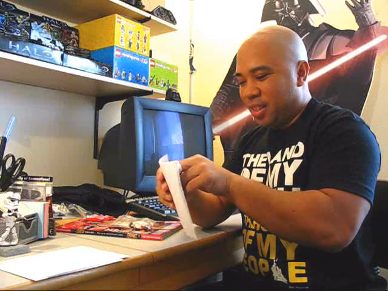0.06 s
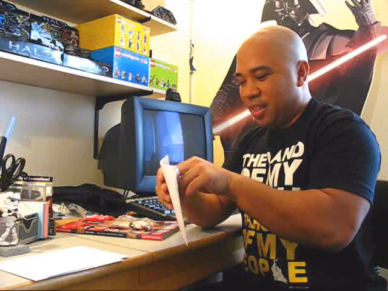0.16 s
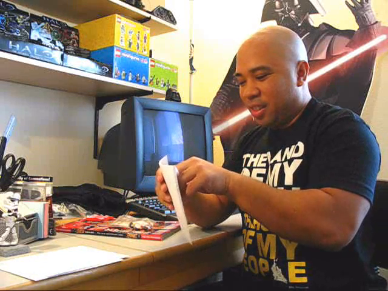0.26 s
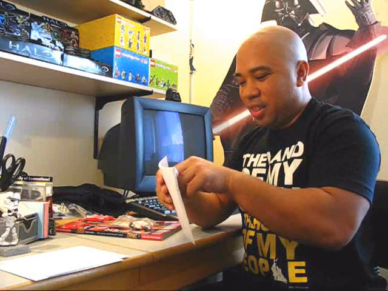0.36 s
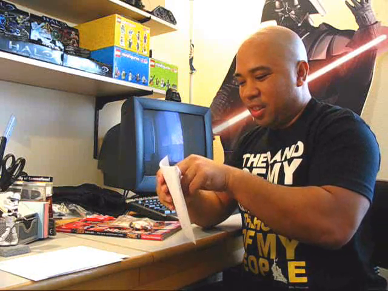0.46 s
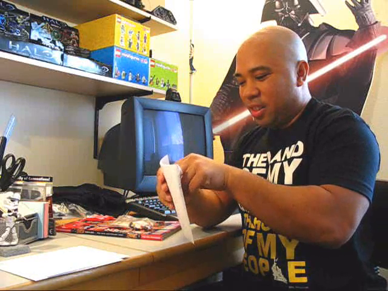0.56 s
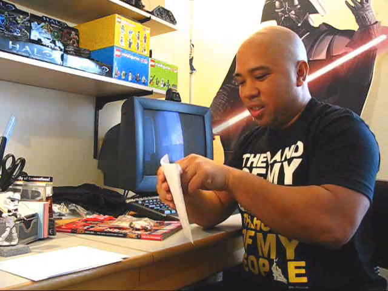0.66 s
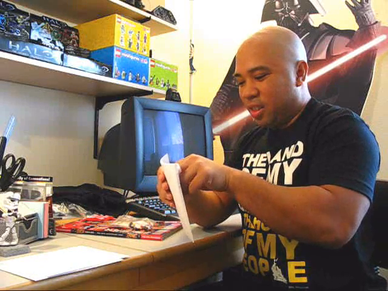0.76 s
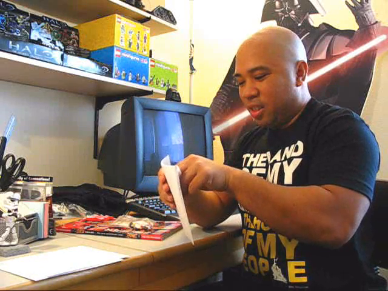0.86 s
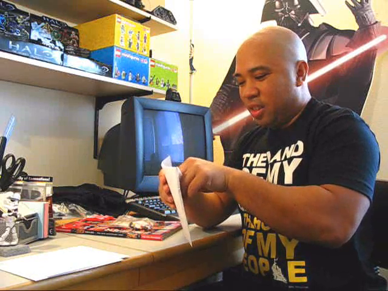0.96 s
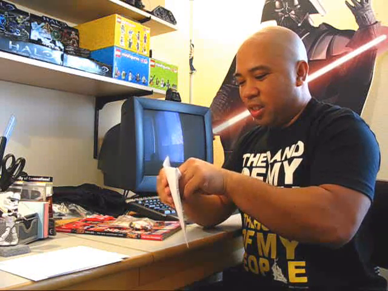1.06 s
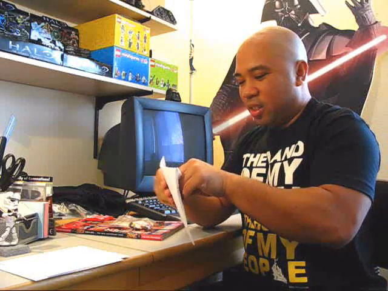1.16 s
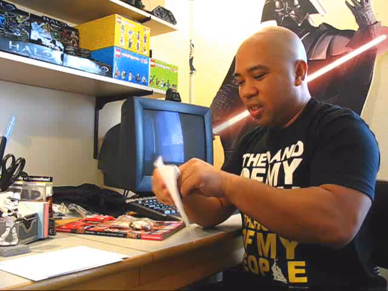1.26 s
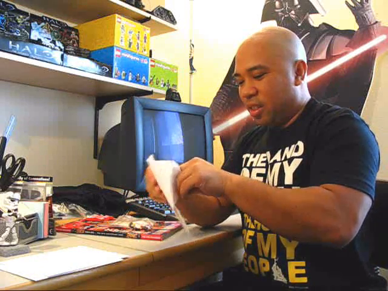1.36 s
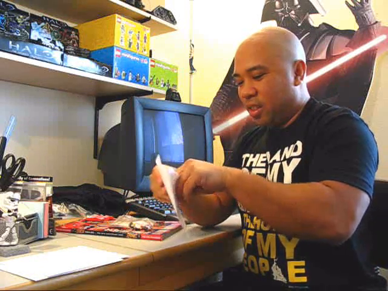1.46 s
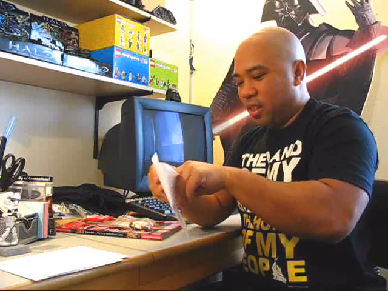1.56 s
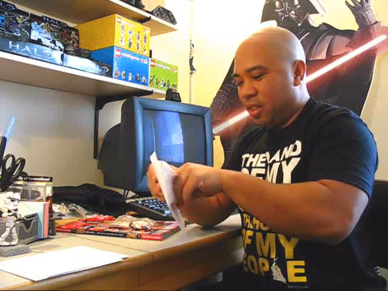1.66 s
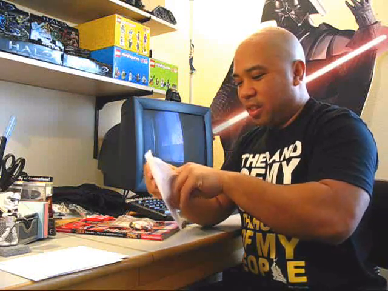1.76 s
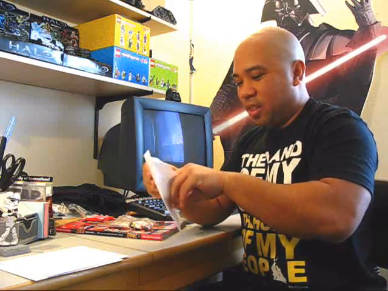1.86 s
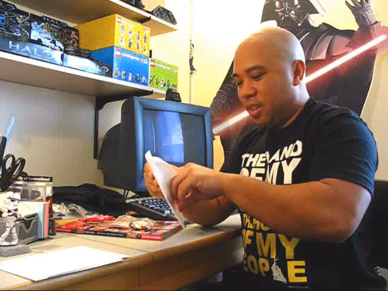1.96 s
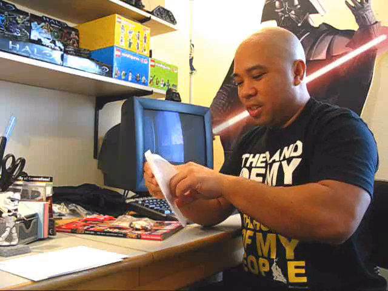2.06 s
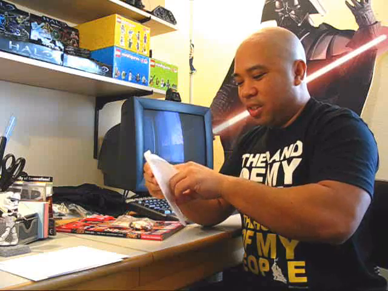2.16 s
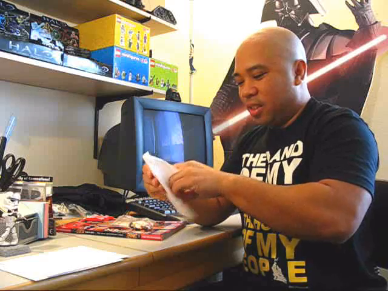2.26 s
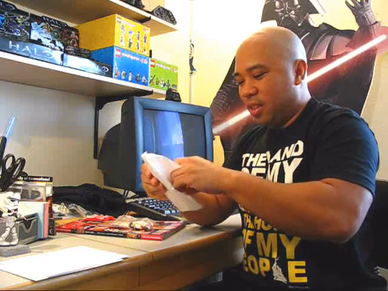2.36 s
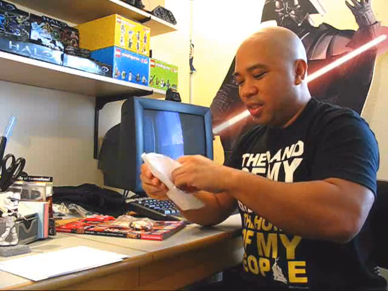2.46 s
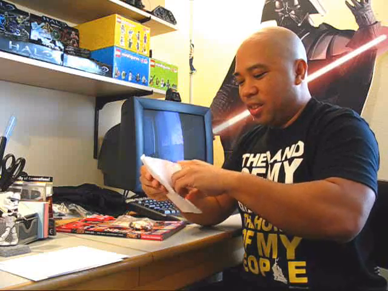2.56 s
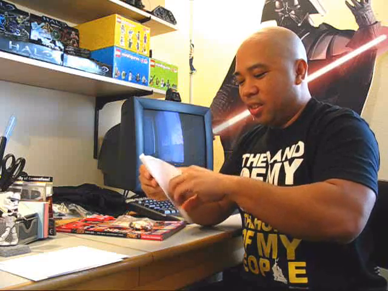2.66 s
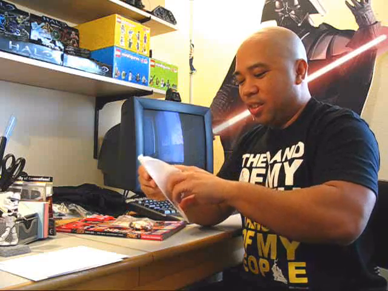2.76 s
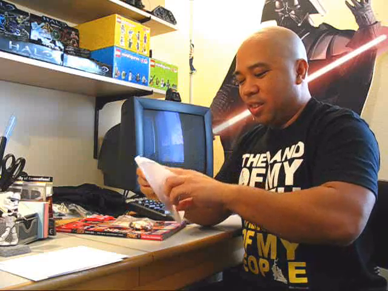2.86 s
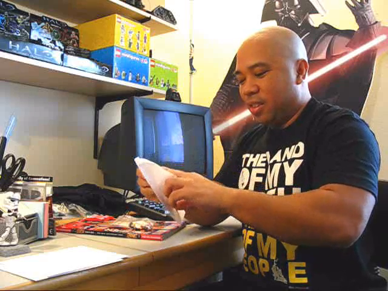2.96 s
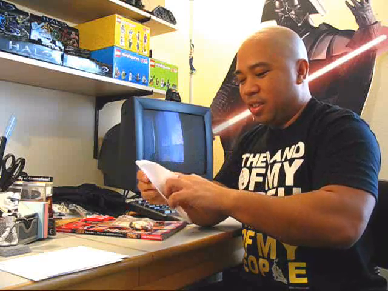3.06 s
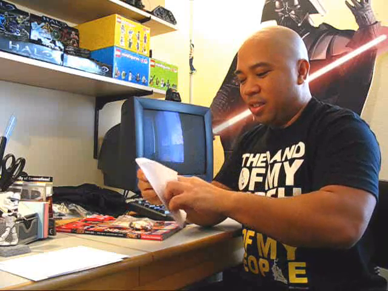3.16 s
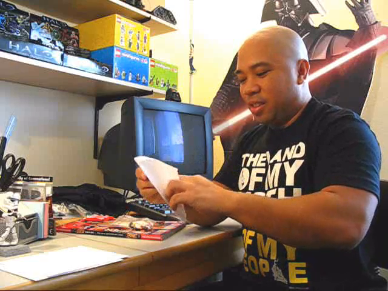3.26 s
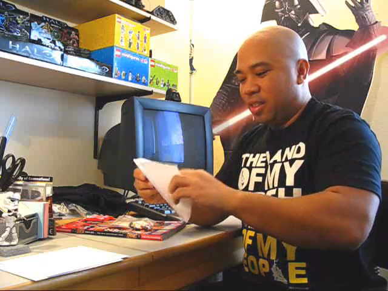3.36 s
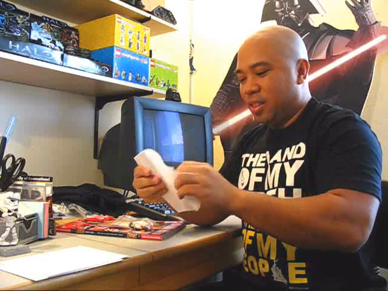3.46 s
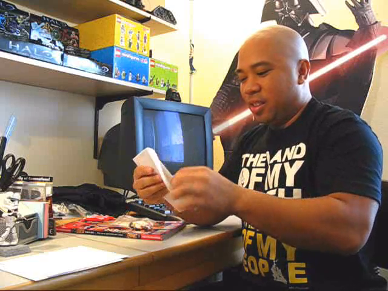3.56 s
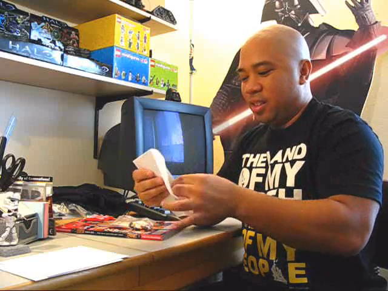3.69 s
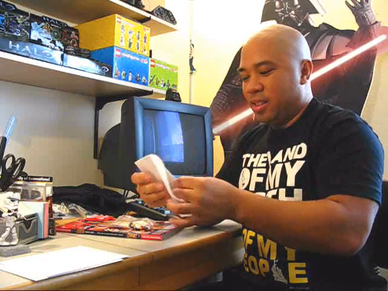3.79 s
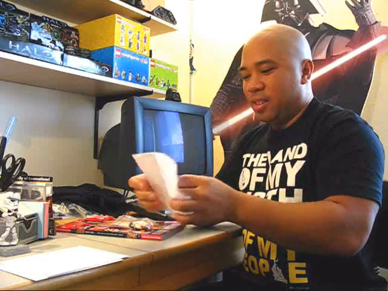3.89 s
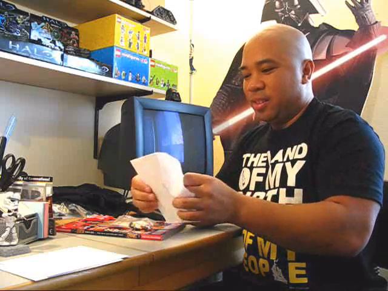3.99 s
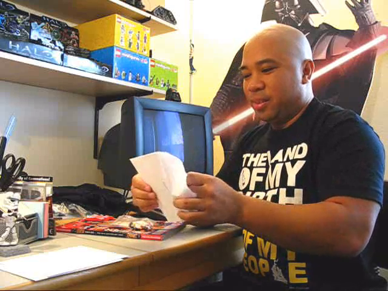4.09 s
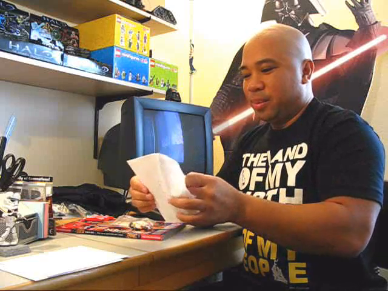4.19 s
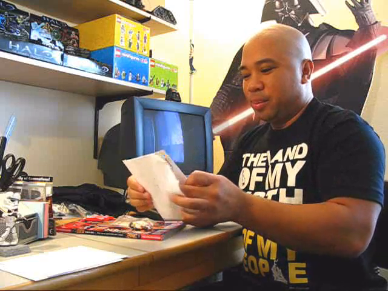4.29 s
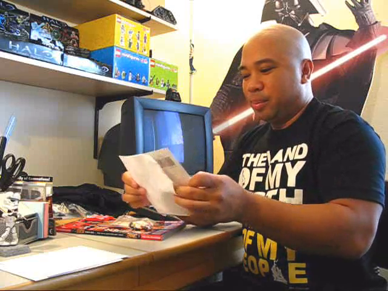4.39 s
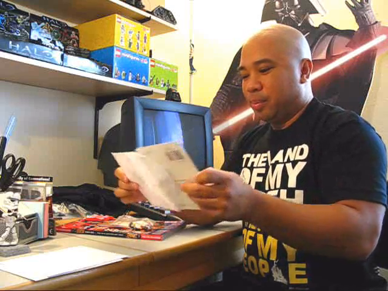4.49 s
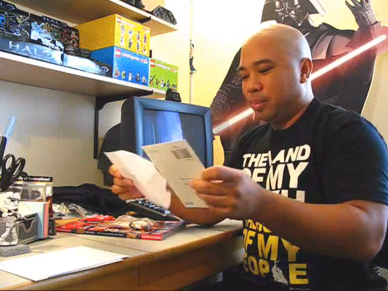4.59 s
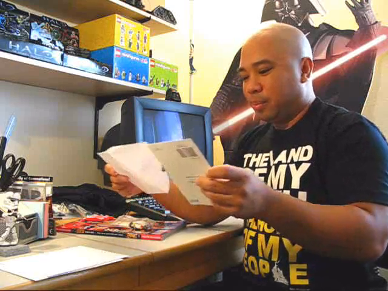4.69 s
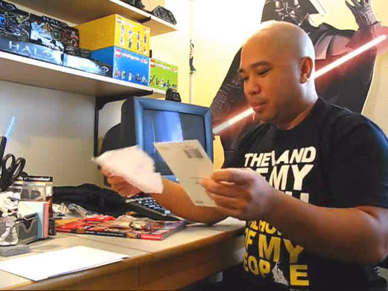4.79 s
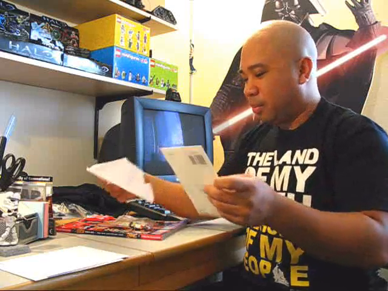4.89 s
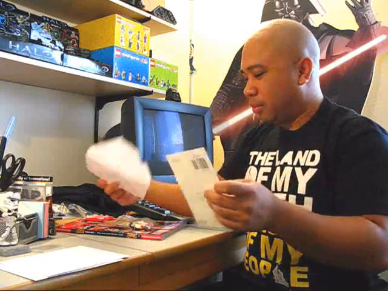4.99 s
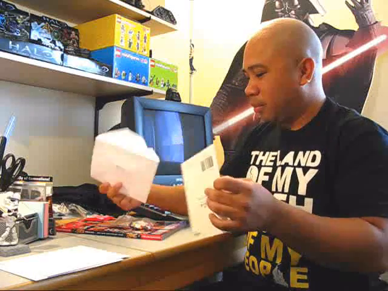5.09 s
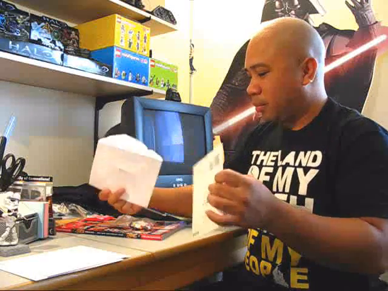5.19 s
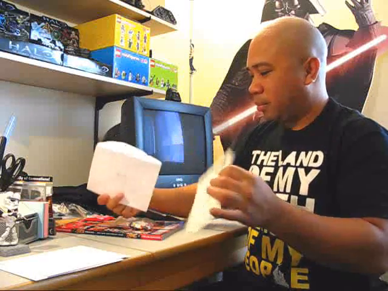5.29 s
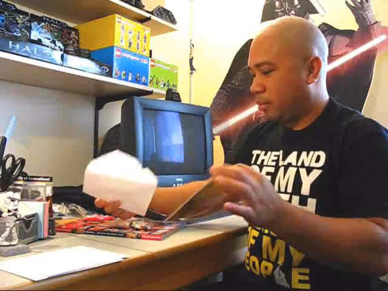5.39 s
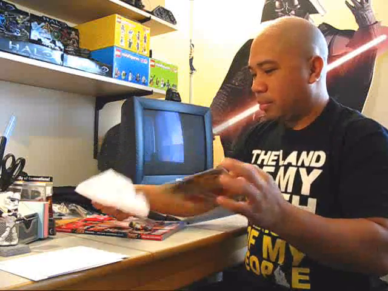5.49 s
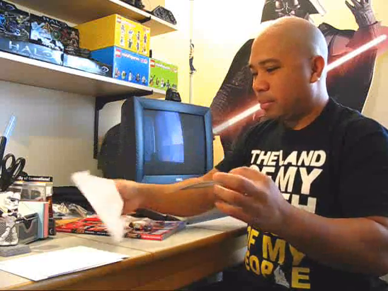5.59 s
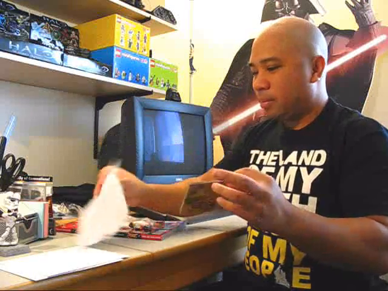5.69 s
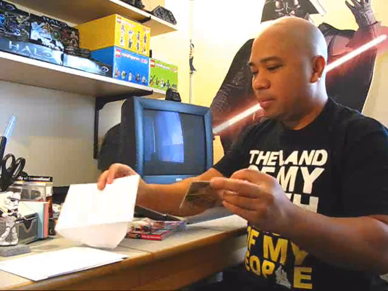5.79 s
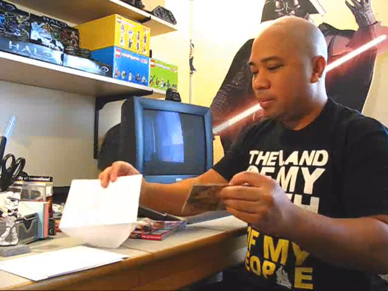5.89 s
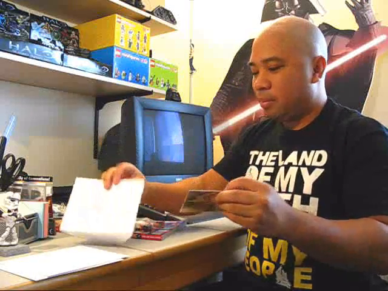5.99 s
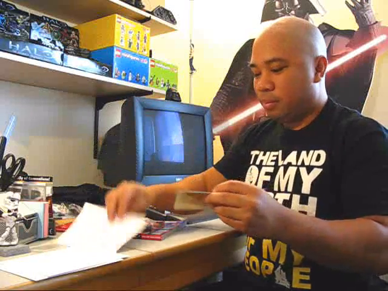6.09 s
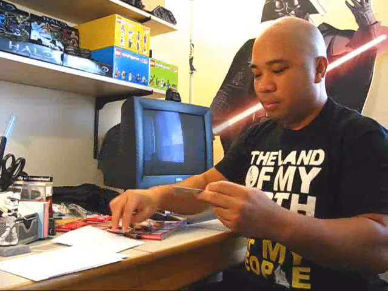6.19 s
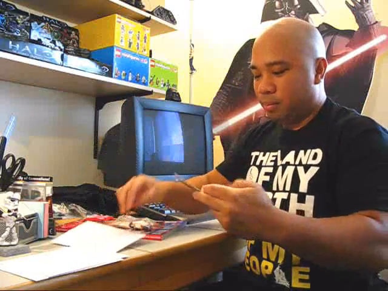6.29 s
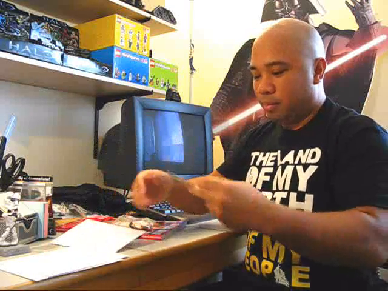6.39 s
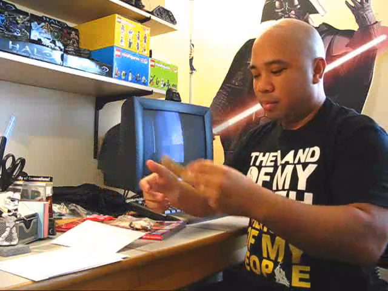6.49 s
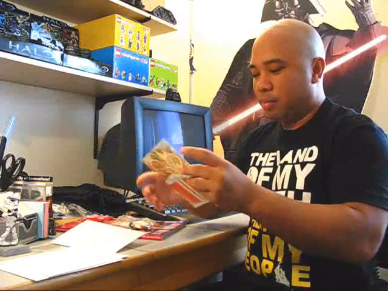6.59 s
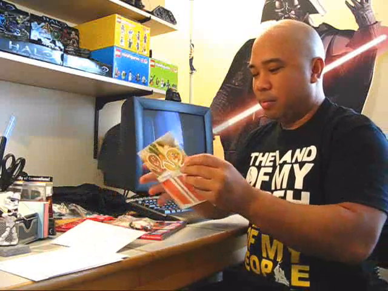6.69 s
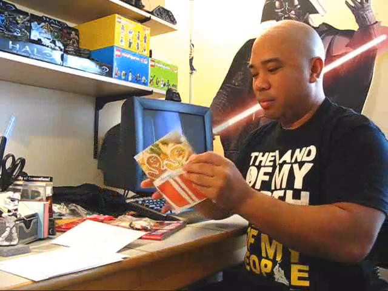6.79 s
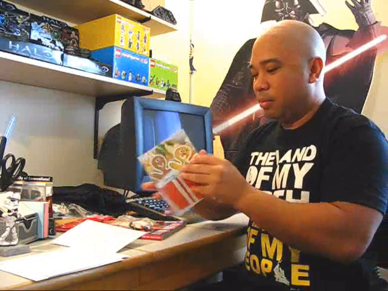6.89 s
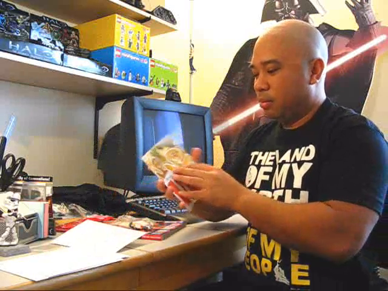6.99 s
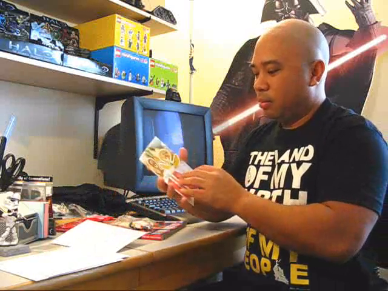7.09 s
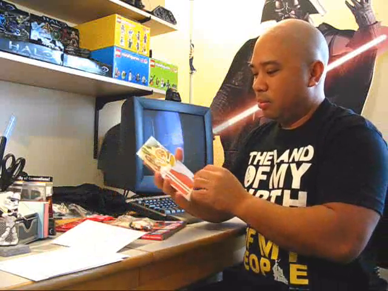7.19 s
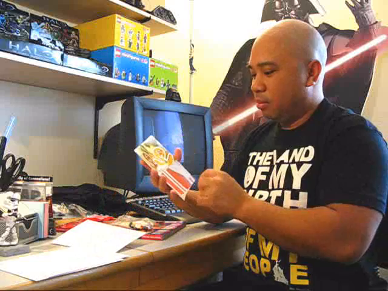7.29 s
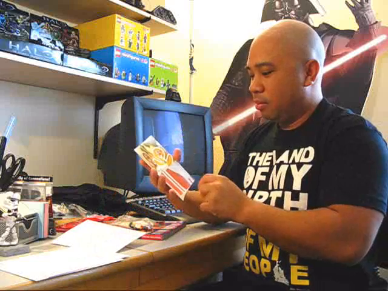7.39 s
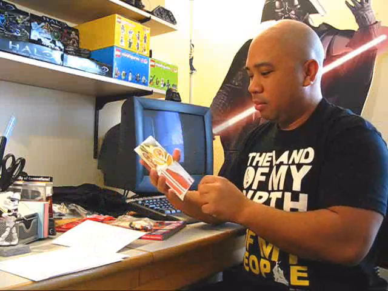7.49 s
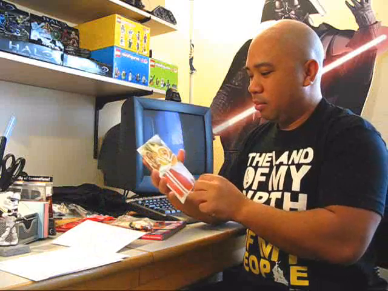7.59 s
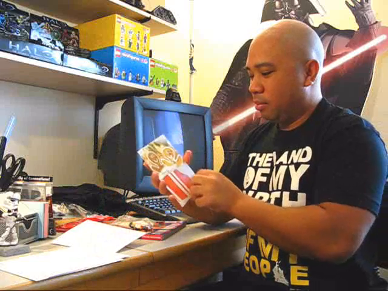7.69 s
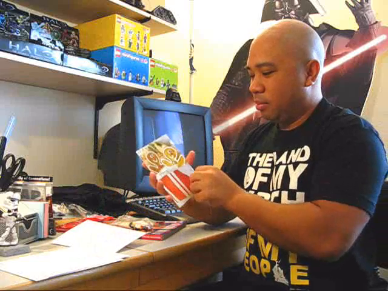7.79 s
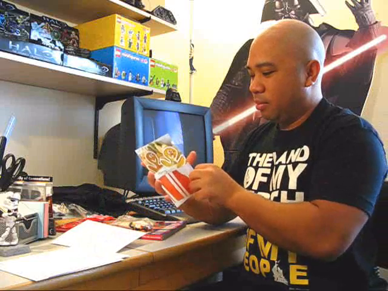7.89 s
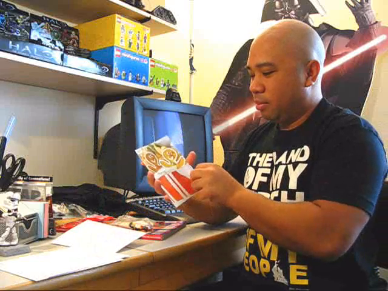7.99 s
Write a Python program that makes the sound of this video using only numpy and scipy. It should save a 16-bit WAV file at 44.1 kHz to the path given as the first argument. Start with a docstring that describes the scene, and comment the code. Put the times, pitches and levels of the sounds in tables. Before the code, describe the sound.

A paper envelope is torn open with crisp rips and snaps, then a card slides out and is softly handled in a small room.

```python
"""A paper envelope is torn open at a desk in a small room; a card slides out, the envelope drops.
Creases snap as panels flip, fibres part in dense crackle, sheets rub; the envelope's pocket colours these.
Two loud snaps carry a short low thump, and fingertips tap the card.
The walls answer each snap, over a steady room hiss."""
import sys
import numpy as np
from scipy import signal
from scipy.fft import rfft, irfft, next_fast_len
from scipy.io import wavfile
from scipy.ndimage import uniform_filter1d, map_coordinates

SR = 44100
rng = np.random.default_rng(int(sys.argv[2]) if len(sys.argv) > 2 else 0)


def put_to_file(sound):
    """Save the sound as 16-bit audio at rate SR, in the file named by the first command-line argument."""
    columns = np.atleast_2d(sound).T  # one column per channel
    safe = np.clip(columns, -1, 1)
    whole_steps = np.round(safe * 32767)
    wavfile.write(sys.argv[1], SR, whole_steps.astype(np.int16))


N = 355005


def amp(db):
    """dB to gain."""
    return 10 ** (np.asarray(db) / 20)


def unit(x):
    """x at rms 1."""
    return x / np.sqrt(np.mean(x ** 2) + 1e-20)


def along(points, hz):
    """Interpolate (hz, value) points on a log frequency axis."""
    point_hz, values = np.transpose(points)
    return np.interp(np.log(hz + 1), np.log(point_hz + 1), values)


def filtered(x, response):
    """x through response(hz)."""
    size = next_fast_len(len(x) + 8192)
    return irfft(rfft(x, size) * response(np.fft.rfftfreq(size, 1 / SR)), size)[:len(x)]


def coloured(x, spectrum):
    """x shaped by (hz, gain_db) points, at rms 1."""
    return unit(filtered(x, lambda f: amp(along(spectrum, f))))


def wobble(rate_hz):
    """Smooth random curve with knots at rate_hz."""
    knots = rng.standard_normal(int(N * rate_hz / SR) + 4)
    return map_coordinates(knots, [np.arange(N) * rate_hz / SR])


def resonance(hz, q):
    """Causal band-pass response around hz."""
    return lambda f: 1j * f * hz / q / (hz * hz - f * f + 1j * f * hz / q)


def hiss(level_db=-49):
    """Room air and microphone noise, wavering slightly."""
    # noise floor: freq_hz, gain_db
    spectrum = [(12, -30), (25, -6.5), (70, -2), (250, 0), (500, -1), (1000, -5), (2000, -8.5),
                (4000, -12.5), (8000, -16), (13000, -18.5), (16000, -22)]
    noise = coloured(rng.standard_normal(N), spectrum)
    return amp(level_db + 0.2 * wobble(3.97)) * noise


def room_response(answer_db=-6.5, build_s=0.0023):
    """Direct sound, first wall echoes and a fresh diffuse tail."""
    # room decay: freq_hz, t60_s
    decay = [(300, 0.5), (2000, 0.3), (6000, 0.27), (14000, 0.18)]
    # first echoes: delay_s, gain_db
    walls = [(.007, -28), (.0125, -3), (.0195, -23), (.0245, -25)]
    hz, t, spectra = signal.stft(rng.standard_normal(SR // 3), SR, nperseg=256)
    spectra = spectra * amp(-60 * t / along(decay, hz)[:, None])
    response = signal.istft(spectra, SR, nperseg=256)[1][:SR // 3]
    response *= 1 - np.exp(-(np.arange(len(response)) / SR / build_s) ** 2)
    response /= np.linalg.norm(response)
    for (delay_s, gain_db), sign in zip(walls, rng.choice([-1, 1], len(walls))):
        response[round(delay_s * SR)] += sign * amp(gain_db)
    response *= amp(answer_db)
    response[0] = 1
    return response


def finger_taps(rise_s=0.00049, decay_s=0.0043):
    """A soft fingertip bends the card for a few low cycles."""
    # taps on the card: start_s, level_db, pitch_hz
    taps = [(6.922, -29.5, 430), (6.979, -27.5, 230), (6.984, -26, 508)]
    out, t = np.zeros(N + SR), np.arange(SR // 10) / SR
    envelope = np.exp(-t / decay_s) * (1 - np.exp(-t / rise_s))
    for start_s, level_db, pitch_hz in taps:
        out[round(start_s * SR):][:len(t)] += amp(level_db) * np.sin(2 * np.pi * pitch_hz * t) * envelope
    return out[:N]


def low_thumps(rise_s=0.00062):
    """Short, one-sided low thumps that come with two loud snaps."""
    # thumps: start_s, peak_db
    thumps = [(0.243, -30.5), (2.319, -26)]
    out, age = np.zeros(N + SR), np.arange(SR // 50) / SR / rise_s
    for start_s, peak_db in thumps:
        out[round(start_s * SR):][:len(age)] += amp(peak_db) * age * np.exp(1 - age)
    return out[:N]


def pocket(x, cutoff_hz=300):
    """The envelope lifts its own resonances a little; a small sheet radiates no bass."""
    # pocket and flap modes: pitch_hz, width_hz, relative_db
    modes = [(820, 6.8, -25), (1480, 12, 1), (1680, 7.6, -8), (2830, 300, -36.5)]
    lift = lambda f: 1 + .5 * sum(amp(db) * resonance(hz, hz / width_hz)(f) for hz, width_hz, db in modes)
    low_cut = lambda f: (1j * f / (cutoff_hz + 1j * f)) ** 2
    return filtered(x, lambda f: lift(f) * low_cut(f))


def crease_snaps(edge_db=-0.5, onset_delay_s=.0008, crack_hz=10000, thud_hz=900):
    """A crease snaps: a short ringing click, a bright crack and the room's echo."""
    # crease snaps: start_s, level_db, panel_hz, edge_hz, thud_db, crack_db (last two re the swing)
    snaps = [(0.1445, -23, 1190, 3570, 2.5, -34), (0.2009, -16.5, 3490, 3680, -39, -20),
             (0.2442, 3.5, 2660, 5600, -16.5, -5), (0.348, -11, 2220, 3900, -7, -24),
             (0.4882, -14.5, 2340, 5100, -21, -8), (0.5072, -19.5, 2320, 3710, -8, -31),
             (0.602, -23, 2670, 3640, -4.5, -25), (0.6428, -11.5, 2970, 3770, -15, -28),
             (0.6536, -10, 2320, 3600, -21, -29), (0.7116, -15.5, 3270, 4160, -34, -16),
             (0.764, -18.5, 2990, 6340, -24, -2), (0.9645, -10, 2800, 5350, -33, -26),
             (1.0334, -14.5, 2970, 5550, -26, -15), (1.075, -4, 2140, 3400, -18, -9),
             (1.1344, -1, 3200, 8850, -18, -11), (1.3435, -9, 2300, 6500, -16, -6),
             (1.3497, -9, 2730, 4030, -42, 0), (1.479, -18, 2680, 5140, -3, -24),
             (1.594, -22, 3590, 4300, -7, 3), (1.6091, -8, 2250, 4200, -44, 1),
             (1.8535, -16, 3540, 3950, -37, 1), (1.8761, -9.5, 1520, 7300, -41, -2),
             (2.0036, -10.5, 3030, 8360, -14.5, -22), (2.0492, -13, 3000, 3860, -37, -7),
             (2.0807, -22, 1560, 3690, -21, -16), (2.1053, -22, 2860, 5010, -37, -6),
             (2.2035, -21, 2360, 4300, -6, 0), (2.22, -20, 3240, 4270, -25, -18),
             (2.3204, -1, 2810, 5540, -20, 1.5), (2.4486, -19, 1500, 3880, -25, -12),
             (2.4696, -0.5, 2360, 3910, -17.5, -11), (2.5326, -14, 3280, 4240, -26, -16),
             (2.588, -18, 3500, 8300, -38, 9), (2.6388, -7, 2900, 7960, -29, -9),
             (2.7374, -21, 2490, 3800, -20, -20), (2.7433, -20, 3410, 3840, -30, -15),
             (2.7865, -19, 2500, 4170, -17, -2), (2.81, -8, 2450, 5300, -15.5, -28),
             (2.8947, -23, 820, 3920, 7, -18), (2.9302, -2.5, 3120, 4560, -35, -2),
             (3.0981, -2, 3080, 5200, -33, -2), (3.1574, -5, 3440, 5300, -10, -7),
             (3.3414, -24.5, 2180, 3960, -10, -16), (3.4156, -19.5, 2670, 4750, -9, -22),
             (3.466, -2.5, 3130, 5330, -9.5, -6), (3.4726, -5, 3230, 3860, -35, -2.5),
             (3.5774, -17, 3030, 4700, -22, -13), (4.0315, -3.5, 3420, 4700, -47, -13),
             (4.1944, -25.5, 3300, 3760, -2, -4), (4.2939, -11.5, 2800, 4030, -29, -17),
             (4.3316, -15, 1980, 5440, -29, -14), (4.4028, -14, 3600, 3750, -22, -16),
             (4.4606, -8.5, 2480, 3840, -15, -0.5), (5.1809, -34, 1010, 3600, 7, -24),
             (5.282, -35, 1010, 6860, 5, -17), (6.1157, -23, 1650, 3600, 2.5, -22),
             (6.1236, -14.5, 1700, 3860, 0.5, -19), (6.1324, -14.5, 3080, 4260, -20, -26),
             (6.202, -14.5, 1820, 3900, -8, -29), (6.324, -33, 2060, 3940, -17, -25),
             (6.9736, -24, 1740, 8400, 1, -20), (6.9803, -21, 1390, 4660, -22, -28),
             (7.0855, -26.5, 2090, 3940, -15, -11)]
    out, t = np.zeros(N + SR), np.arange(SR // 50) / SR
    for start_s, level_db, panel_hz, edge_hz, thud_db, crack_db in snaps:
        flip_noise, crack_noise = rng.standard_normal((2, len(t)))
        pulse = np.exp(-t / .00004) + 0.4 * np.exp(-t / 0.0003) * flip_noise
        steps = np.zeros(SR // 300)  # the crease gives way in a few quick steps
        steps[rng.integers(8, len(steps), 3)] = .55 * rng.uniform(-1, 1, 3)
        steps[0] = 1
        flip = np.convolve(pulse, steps)[:len(t)]
        panel, edge = resonance(panel_hz, q=2.1), resonance(edge_hz, q=2.5)
        swing = filtered(flip, lambda f: panel(f) - amp(edge_db) * edge(f))
        crack = filtered(np.exp(-t / 0.001) * crack_noise, lambda f: resonance(crack_hz, q=1.2)(f) ** 2)
        thud = np.sin(2 * np.pi * thud_hz * t) * np.exp(-t / 0.0009)
        snap = swing / np.abs(swing).max() + amp(crack_db) * crack / np.abs(crack).max()
        snap += amp(thud_db) * thud
        heard = signal.fftconvolve(snap, room_response())
        out[round((start_s + onset_delay_s) * SR):][:len(heard)] += amp(level_db) * heard
    return out[:N]


def fibre_ticks(rate_hz, spread_db, rattle_s=0.00025):
    """Fibres part one by one: clumped, uneven ticks over the smooth rush of their echoes."""
    chance = rate_hz / SR * amp(2.4 * wobble(60))
    ticks = (rng.random(N) < chance) * amp(spread_db * np.minimum(rng.exponential(1, N), 3))
    bursts = signal.lfilter([1], [1, -np.exp(-1 / (rattle_s * SR))], ticks)
    return unit(bursts * rng.standard_normal(N)) + rng.standard_normal(N)


def sheet_bending(x, depth_db):
    """The bending sheet keeps changing which pitches it radiates."""
    spectra = signal.stft(x, nperseg=512)[2]
    patches = uniform_filter1d(rng.standard_normal(spectra.shape), size=4, axis=0)
    patches = uniform_filter1d(patches, size=6, axis=1)
    return signal.istft(spectra * amp(depth_db * unit(patches)), nperseg=512)[1][:N]


def stroke_gains(rise_db=20):
    """Crackle, flex and fibre gains: each stroke rises, holds and fades; powers add."""
    # rips and rubs: full_s, rise_s, hold_s, crackle_db, flex_db, fibre_db (last two re crackle)
    strokes = [(0.0, .01, 0.0084, -25, -6, -1.5), (.15, .006, .035, -46, 2.5, -8),
               (0.207, 0.03, 0.017, -36.5, -8, -9), (0.252, 0.012, 0.016, -26.5, -8, -3.5),
               (0.35, 0.012, 0.0051, -39.5, 3.5, -4), (0.493, 0.002, 0.028, -41, -2.5, -4),
               (0.648, 0.026, 0.0049, -38, 3.5, -3), (.716, .005, 0.0087, -44, -8, -8),
               (0.771, 0.073, 0.0084, -45, -15, 1.5), (0.968, 0.0013, 0.0045, -32, -7.5, 5.5),
               (1.04, 0.06, 0.0046, -42.5, -6, 1), (1.08, 0.0013, .008, -38.5, 4, 0),
               (1.138, 0.0013, 0.0063, -34, -0.5, 5), (1.35, 0.016, 0.051, -28, -9, 3.5),
               (1.508, 0.098, 0.016, -37, -2, -0.5), (1.59, .008, .012, -39, -8, 4),
               (1.615, .006, 0.1, -31.5, -6.5, 6), (1.802, .1, 0.046, -38.5, -3.5, 5.5),
               (1.856, 0.0033, 0.027, -33, -19, 5), (2.006, 0.006, .005, -36, 0.5, 0),
               (2.055, .01, .035, -38, -7, 0.5), (2.109, .02, 0.1, -38.5, -10.5, 4.5),
               (2.324, 0.0013, 0.0058, -30.5, -11, 10), (2.39, 0.033, 0.024, -45, -4, 1),
               (2.45, .02, .012, -40, 1, -10), (2.478, 0.0083, 0.022, -31, -5, 0.5),
               (2.593, 0.029, 0.062, -31.5, -16.5, 7), (2.748, 0.023, 0.028, -36, -12, 2.5),
               (2.9, .005, 0.018, -46.5, 8, -5), (2.934, 0.012, 0.005, -32.5, -1.5, 2.5),
               (3.075, .08, 0.013, -45, -7, -1), (3.101, 0.0079, 0.065, -29, -5.5, 3.5),
               (3.258, 0.3, 0.029, -49.5, -17, 5.5), (3.408, 0.05, 0.0097, -44, -4, -5),
               (3.471, 0.0013, 0.023, -27.5, 1, 0), (3.59, .02, .01, -44.5, -2, -3),
               (3.692, 0.27, 0.036, -49, -18, 2.5), (3.835, 0.21, .01, -51.5, -5, 7),
               (3.96, .12, 0.013, -52, -12, 3), (4.015, 0.064, .015, -41, -14, -1.5),
               (4.036, 0.0082, 0.0069, -34, 1.5, 4), (4.288, 0.13, 0.058, -33.5, -1, 0),
               (4.398, 0.059, 0.092, -38, -15, 3), (4.468, .006, 0.014, -36.5, -8, 0),
               (4.54, .1, .02, -40, -4, 6), (5.122, 0.14, 0.0096, -50, -2.5, 4.5),
               (5.188, .006, .025, -54, 9.5, -13), (5.288, 0.015, 0.009, -52.5, 9, 4),
               (5.443, 0.01, .01, -60, -9, 6), (5.52, .05, 0.016, -61, -8, 5),
               (5.58, 0.017, 0.046, -61, -3, 4), (5.908, 0.0067, 0.021, -57, -1, 2.5),
               (6.09, 0.049, .01, -59, -3, 3), (6.125, 0.011, .03, -38.5, 6, 3.5),
               (6.207, 0.03, .01, -40.5, 4.5, -9), (6.331, .055, 0.0056, -47.5, 3, 1.5),
               (6.608, 0.01, .005, -53, -5, -1), (6.905, 0.062, .02, -53, 2.5, 5.5),
               (6.981, .04, 0.011, -47.5, 11, -0.5), (7.03, .05, .02, -49.5, 0, -6),
               (7.088, .05, 0.065, -55, 2, -3)]
    # faint rubbing between strokes: time_s, level_db
    handling = [(0, -49.5), (.8, -58), (1.3, -61), (3.6, -50), (3.92, -61.5), (4.6, -62), (5.3, -60),
                (6.0, -64), (7.3, -64.5), (7.5, -65)]
    # room decay after a stroke: crackle_db_per_s, flex_db_per_s, fibre_db_per_s
    fade_db_per_s = [213, 223, 253]
    t = np.arange(0, N + 32, 32) / SR
    power = np.tile(amp(np.interp(t, *np.transpose(handling))) ** 2, (3, 1))
    for full_s, rise_s, hold_s, crackle_db, flex_db, fibre_db in strokes:
        layer_db = crackle_db + np.array([[0], [flex_db], [fibre_db]])
        attack_db = rise_db * np.minimum(t - full_s, 0) / rise_s
        fade_db = np.outer(fade_db_per_s, np.maximum(t - full_s - hold_s, 0))
        power += amp(layer_db + attack_db - fade_db) ** 2
    return [np.interp(np.arange(N) / SR, t, gain) for gain in np.sqrt(power)]


def tearing():
    """Rips and rubs: one stream of ticks shakes the tear line, the sheet and its fine fibres."""
    # tear line crackle: freq_hz, gain_db
    crackle_spectrum = [(700, -51), (1500, -34), (2500, 7), (4000, 5.5), (6000, 1), (9000, -14.5)]
    # sheet flex: freq_hz, gain_db
    flex_spectrum = [(150, -41), (400, -0.5), (900, -1), (1500, 5), (2200, -0.5), (4000, -41.5)]
    # fine fibres: freq_hz, gain_db
    fibre_spectrum = [(3500, -7), (6000, 0.5), (8000, 5), (12500, 5), (14500, 0), (16000, -30.5)]
    crackle_gain, flex_gain, fibre_gain = stroke_gains()
    ticks = sheet_bending(fibre_ticks(rate_hz=2500, spread_db=2.6), depth_db=2.1)
    grip = np.clip((20 * np.log10(crackle_gain) + 56) / 10, 0, 1)  # light touch slides, firm crackles
    drive = grip * unit(ticks) + np.sqrt(1 - grip ** 2) * rng.standard_normal(N)
    crackle = crackle_gain * coloured(drive, crackle_spectrum)
    flex = flex_gain * coloured(drive, flex_spectrum)
    fibre = fibre_gain * coloured(drive, fibre_spectrum)
    return amp(0.89 * wobble(30)) * (crackle + flex + fibre)


def scene():
    """Paper, thumps and taps over room hiss; mono."""
    paper = pocket(crease_snaps() + tearing())
    return (paper + low_thumps() + finger_taps() + hiss())[None]


def record(dry):
    """The loudest snaps overload the input; a steep low-pass limits the band."""
    ceiling, top_hz = 1.05, 15450
    clipped = dry[0] / (1 + np.abs(dry[0] / ceiling) ** 12) ** (1 / 12)
    return filtered(clipped, lambda f: 1 / (1 + (f / top_hz) ** 120))[None]


dry = scene()
out = record(dry)
put_to_file(out)
```